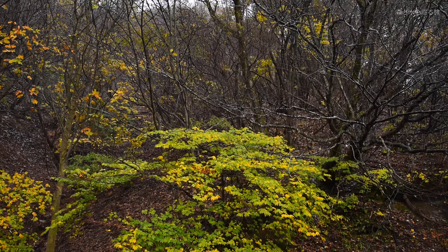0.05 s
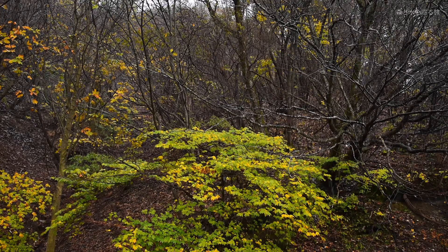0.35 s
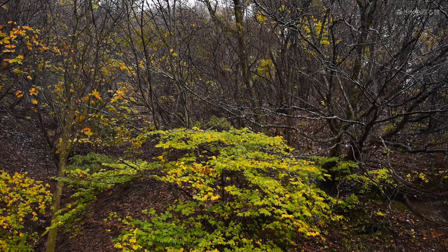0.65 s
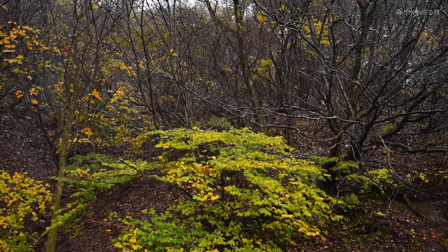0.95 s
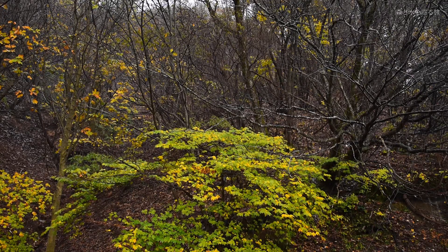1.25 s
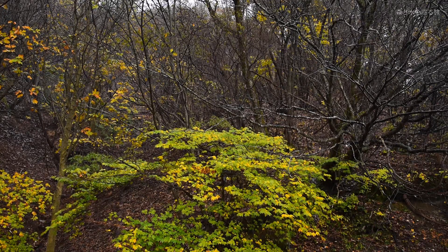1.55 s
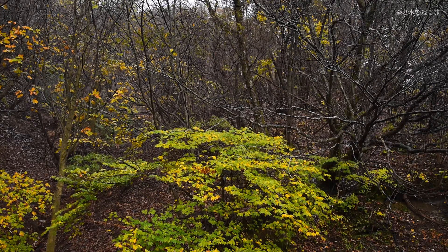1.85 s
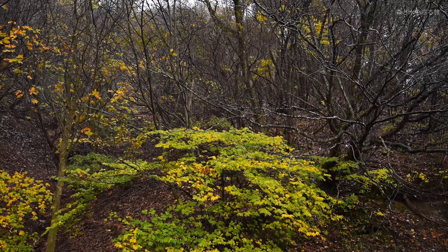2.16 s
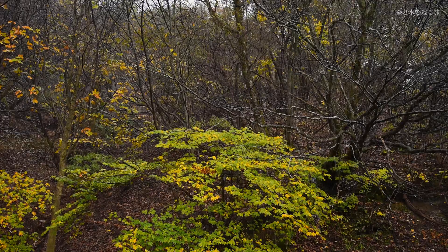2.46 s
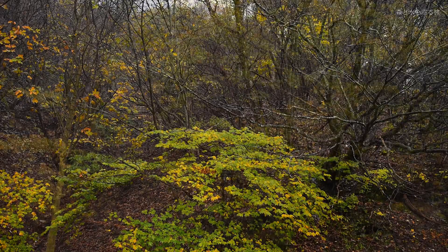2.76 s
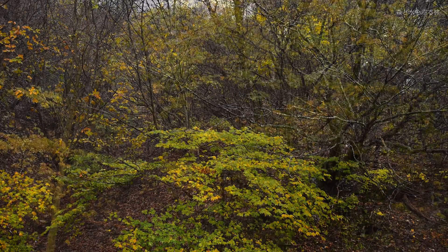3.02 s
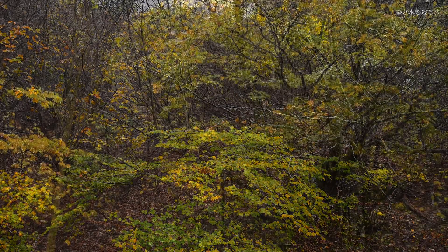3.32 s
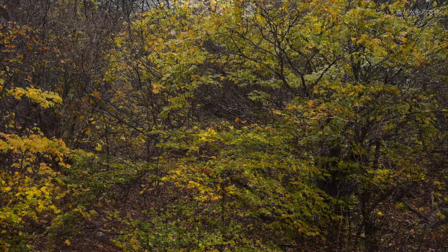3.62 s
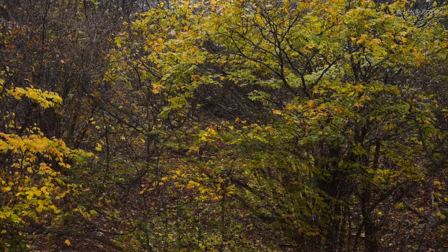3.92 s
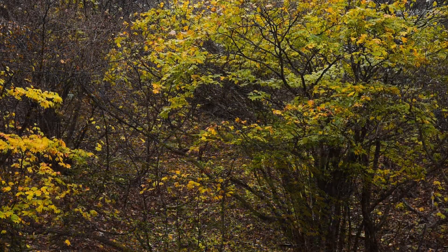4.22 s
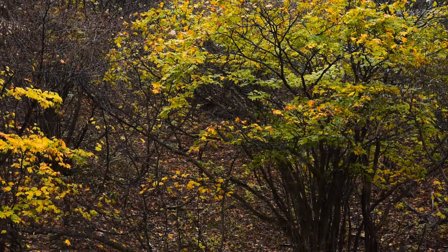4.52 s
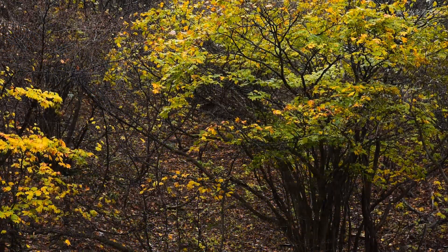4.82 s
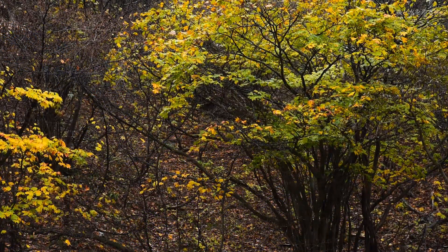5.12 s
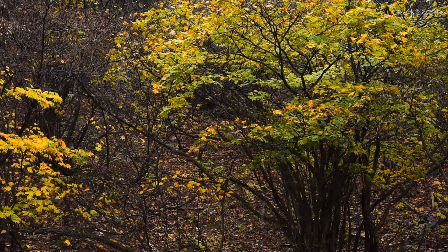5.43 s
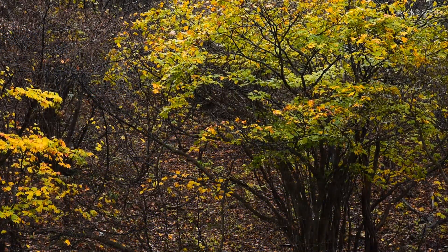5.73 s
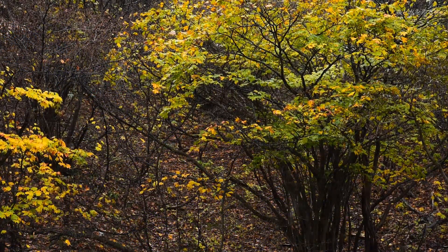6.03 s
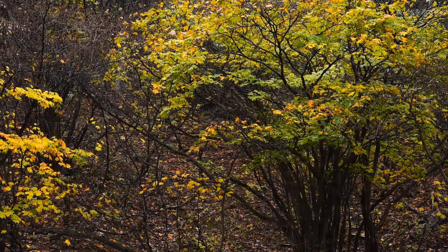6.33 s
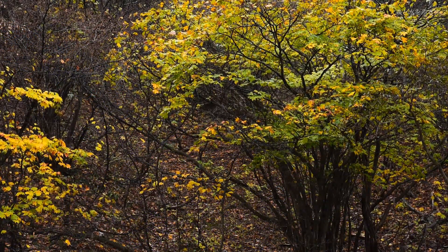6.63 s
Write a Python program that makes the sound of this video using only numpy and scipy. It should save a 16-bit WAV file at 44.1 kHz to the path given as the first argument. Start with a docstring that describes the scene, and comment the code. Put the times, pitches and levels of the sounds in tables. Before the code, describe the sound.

Steady rain falls in a wood throughout, a bright, wide hiss of fine drops on twigs with a softer patter on wet leaves. Single close drops tick and tap irregularly, the sharpest around 1.2 seconds, in a cluster just after 3, and between 4.3 and 4.8 seconds. From about 1 to 3 seconds a gusty breeze buffets the right microphone with a low flutter, strongest just before 2 seconds, then dies away. Between 2 and 3 seconds the rain thickens slightly and stays that way. Underneath, a faint distant rumble swells and sinks, along with the low, even roar of the wood. Two soft, dull thumps sound far off at about 5 and 6.3 seconds. Right after the second, a quick little spill of drips falls from a branch onto the leaf litter, and the rain carries on.

```python
"""A bright hiss of steady rain fills an autumn wood, heard by two spaced microphones. Countless drops
on twigs and wet leaves merge into a wash that slowly thickens; near drops tick and fat drips tap on leaves.
Behind it lie a distant rumble and the wood's low roar. For a few seconds a breeze buffets the right
microphone; near the end come two dull far thumps and a spill of drips from a branch."""
import sys
import numpy as np
from scipy import signal
from scipy.fft import rfft, irfft, next_fast_len
from scipy.io import wavfile

SR = 44100
rng = np.random.default_rng(int(sys.argv[2]) if len(sys.argv) > 2 else 0)


def persist_wave(psi):
    """Save psi, clipped to +-1, as 16-bit WAV."""
    counts = np.round(np.clip(psi, -1, 1) * 32767).astype(np.int16)
    wavfile.write(sys.argv[1], SR, np.atleast_2d(counts).T)


N = 298802
TIME = np.arange(N) / SR
SIZE = next_fast_len(N, True)
HZ = np.fft.rfftfreq(SIZE, 1 / SR) + 1e-3

# Tone of the rain across the whole wood. Each row: frequency in Hz, gain in dB.
RAIN_TONE = [(200, -15.5), (550, -15), (900, -13.5), (1500, -6.5), (2400, -1.5), (3300, -2.5), (4300, -2.5),
             (6500, -0.6), (8000, -0.6), (9300, 0.8), (10500, -4), (12000, -8), (14000, -11.5),
             (15700, -23.5)]


def undb(db):
    """Decibels to gain."""
    return 10 ** (np.asarray(db) / 20)


def unit(x):
    """Scale to rms 1."""
    return x / np.sqrt(np.mean(x ** 2))


def spectrum(points):
    """An EQ curve through (Hz, dB) points, as a gain at every frequency."""
    hz, db = np.transpose(points)
    return undb(np.interp(np.log(HZ), np.log(hz), db))


def colour(x, gain):
    """Filter with a gain for every frequency."""
    return irfft(rfft(x, SIZE) * gain, SIZE)[..., :N]


def band(x, hz, q):
    """One broad resonance."""
    hz = min(hz, .4 * SR)
    return signal.lfilter(*signal.iirpeak(hz, max(q, 3 * hz / SR), SR), x)


def wander(per_s):
    """A random drift with a spread of 1."""
    knots = rng.standard_normal(2048)
    return np.interp(TIME * per_s, np.arange(len(knots)), knots) * np.sqrt(3 / 2)


def swell(crest_s, length_s):
    """A smooth rise to 1 and fall, above one half for its length."""
    return .5 ** ((2 * (TIME - crest_s) / length_s) ** 2)


def place(out, start_s, sound, pan_db=0):
    """Mix a short sound in; pan is left minus right."""
    i = int(start_s * SR)
    sound = sound[:N - i]
    out[:, i:i + len(sound)] += undb([[pan_db / 2], [-pan_db / 2]]) * sound


def around(count):
    """Evenly spread angles from left to right, in radians."""
    return np.pi * ((np.arange(count) + .5) / count - .5)


def arrive(x, angle, spacing_s=.00027):
    """Sound from an angle (right is positive) reaches the nearer microphone first."""
    lag = int(round(spacing_s * SR * np.sin(angle)))
    return np.array([np.roll(x, lag), x])


def impacts(per_s, spread_db):
    """Random hits: a positive spread makes a few near and strong, a negative one makes a few faint."""
    lands = np.flatnonzero(rng.random(N) < per_s / SR)
    spread = np.minimum(rng.standard_exponential(N)[lands], 4)
    out = np.zeros(N)
    out[lands] = undb(spread_db * spread) * rng.choice([-1, 1], N)[lands]
    return out


def ring(hz, cycles):
    """A struck, well damped surface; its envelope peaks after the given cycles."""
    turns = np.arange(SR // 8) / SR * hz
    return np.sin(2 * np.pi * turns) * turns / cycles * np.exp(1 - turns / cycles)


def distant(tone, side_db):
    """Far noise, nearly the same at both microphones."""
    mid, side = unit(colour(rng.standard_normal((2, N)), spectrum(tone)))
    return mid + undb(side_db) * side * np.array([[1], [-1]])


def far_rumble(rest_db=-51):
    """A low rumble carries from far away, swelling and sinking."""
    # Tone of the rumble. Each row: frequency in Hz, gain in dB.
    tone = [(20, -32), (45, -15), (80, -5), (110, -1.5), (140, -0.5), (175, -9.5), (260, -14.5), (500, -34),
            (1200, -52)]
    # Its swells. Each row: crest time in seconds, length in seconds, rise in dB.
    swells = [(.65, 0.8, 6.5), (2.4, 2.3, 4), (6.65, 0.83, 6)]
    level_db = rest_db + sum(rise_db * swell(s, length_s) for s, length_s, rise_db in swells)
    return undb(level_db) * distant(tone, side_db=-22)


def wood_roar(rest_db=-48.5, rise_db=3.2):
    """The wood's far, even roar swells once, as the rain thickens."""
    # Tone of the roar. Each row: frequency in Hz, gain in dB.
    tone = [(60, -20), (160, 0), (240, 5), (330, 4.5), (450, -5.5), (620, -19.5), (900, -10.5), (1300, -21),
            (2500, -16)]
    level_db = rest_db + rise_db * swell(crest_s=3.2, length_s=0.88)
    return undb(level_db) * distant(tone, side_db=-9.5)


def far_thumps():
    """Something thumps dully far off."""
    # The thumps. Each row: start in seconds, level in dB, pitch in Hz.
    thumps = [(5.058, -36, 126), (6.256, -33, 120)]
    out = np.zeros((2, N))
    for start_s, db, hz in thumps:
        place(out, start_s, undb(db) * ring(hz, cycles=1.2))
    return out


def breeze(crest_s=2.6, crest_db=-42, rise_db_per_s=8, fall_db_per_s=8.5, flutter_db=2.2):
    """A gusty breeze rises and dies away; its eddies push on each microphone separately."""
    # Tone of the buffeting. Each row: frequency in Hz, gain in dB.
    tone = [(20, -30), (40, -6), (62, -5.5), (85, 3.5), (110, -3.5), (145, -11), (185, -12), (250, -21.5),
            (400, -32), (1000, -65)]
    # Gusts on top of the flow. Each row: crest time in seconds, length in seconds, strength in dB.
    gusts = [(0.43, .07, -43), (.65, .17, -45), (1.022, 0.084, -35.5), (1.276, 0.074, -42),
             (1.45, .05, -42), (1.587, .06, -28), (1.823, 0.11, -26.5), (2.03, 0.1, -33.5),
             (2.204, 0.061, -32), (2.475, 0.15, -36), (2.722, 0.082, -36.5), (2.85, .09, -37),
             (3.07, .16, -45), (3.28, .1, -42), (3.93, .22, -48)]
    since = TIME - crest_s
    flow = undb(crest_db + np.minimum(rise_db_per_s * since, -fall_db_per_s * since))
    power = flow ** 2 + sum(undb(db) ** 2 * swell(s, length_s) for s, length_s, db in gusts)
    buffeting = colour(rng.standard_normal((2, N)), spectrum(tone))
    eddies = unit(buffeting * undb(flutter_db * wander(per_s=25)))
    return eddies * np.sqrt(power) * undb([[-17], [0.5]])  # the left microphone is in the lee


def branch_spill():
    """Heavy drips shaken from a branch hit the leaf litter in a quick run."""
    # The run of drips. Each row: start in seconds, length in seconds, mid-run level in dB.
    spills = [(6.315, 0.064, -32.5)]
    # Tone of drips on the litter. Each row: frequency in Hz, gain in dB.
    tone = [(350, -25), (490, -7), (600, 6), (750, -1), (950, 3), (1200, 4), (1400, -3), (1700, 1),
            (2500, -6), (6000, -36)]
    out = np.zeros((2, N))
    for start_s, length_s, db in spills:
        drips = colour(impacts(per_s=1500, spread_db=1), spectrum(tone))[:int(length_s * SR)]
        arch = np.sin(np.linspace(0, np.pi, len(drips)))
        place(out, start_s, undb(db) * unit(drips) * arch)
    return out


def near_drops(burst_s=0.0006, spray_s=0.0055, spray_db=-12, q=1.0):
    """Each close drop is a sharp splash, a little spray and the brief ring of the leaf it hits."""
    # The drops, before the roll-off. Each row: start in seconds, splash peak in dB, splash centre in Hz,
    # leaf level in dB, leaf pitch in Hz, cycles to the ring's peak, left minus right in dB.
    drops = [(.318, -21, 4600, -23, 4500, 4, 1), (.803, -16, 6500, -26, 6200, 4, 0),
             (1.187, -9, 8800, -38, 3000, 1, -3), (1.445, -13, 9000, -31, 2200, .5, 0),
             (1.889, -19, 8000, -46, 2000, 1, -1), (1.967, -24, 8000, -32, 1700, .7, -1),
             (2.170, -14, 6000, -31, 3300, .9, -5), (3.057, -9.5, 7200, -26, 4200, 2, 2),
             (3.061, -15, 6200, -26, 4700, 2.5, -4), (3.1354, -7, 7500, -19.5, 1776, 2.5, 1),
             (3.2095, -12, 7100, -42, 2500, 1, -4), (3.541, -21, 7000, -29, 2000, .7, -1),
             (3.963, -17, 6200, -27.5, 1600, 1, 5), (4.332, -11, 4600, -21, 4730, 2.5, -1),
             (4.502, -12, 9000, -37, 2500, 1, 1), (4.8358, -9.5, 7550, -36, 2000, .7, 2),
             (4.947, -32, 5000, -34.5, 560, 1.1, 3), (5.148, -26, 6000, -28, 1200, .6, -2),
             (5.8195, -12, 8000, -44, 2500, 1, 11), (6.453, -28, 6000, -30, 1300, 0.83, 2)]
    # Modes of a wet leaf. Each row: multiple of its pitch, gain in dB.
    leaf_modes = [(.88, -5), (1, 2.5), (1.1, -12)]
    # The top of every splash is rolled off, so it sounds duller. Each row: frequency in Hz, gain in dB.
    roll_off = [(2000, -3.5), (9000, -5), (12000, -6.5), (15500, -13)]
    out, age = np.zeros((2, N)), np.arange(SR // 8) / SR
    fade = np.exp(-age / burst_s) + undb(spray_db) * np.exp(-age / spray_s)
    for start_s, splash_db, splash_hz, leaf_db, leaf_hz, cycles, pan_db in drops:
        burst = rng.standard_normal(len(age)) * fade
        splash = band(band(burst, splash_hz, q), splash_hz, q)
        splash /= np.abs(splash).max()
        leaf = sum(undb(db) * ring(leaf_hz * multiple, cycles) for multiple, db in leaf_modes)
        place(out, start_s, undb(splash_db) * splash + undb(leaf_db) * leaf, pan_db)
    return colour(out, spectrum(roll_off))


def patter(low_hz, high_hz, per_s, spread_db, cycles, count):
    """Random taps ring briefly, as drops do on leaves of many sizes; each pitch has its own direction."""
    out = 0
    for hz, angle in zip(np.geomspace(low_hz, high_hz, count), rng.permutation(around(count))):
        taps = signal.oaconvolve(impacts(per_s, spread_db), ring(hz, cycles))[:N]
        out = out + arrive(unit(taps), angle)
    return unit(out)


def bush_splashes(low_hz=3800, high_hz=10500, burst_s=0.00033, spray_s=0.014, spray_db=-11):
    """Drops burst on the bushes to either side, in six registers; their spray lands just after."""
    out, age = 0, np.arange(SR // 16) / SR
    power = np.exp(-2 * age / burst_s) + undb(spray_db) ** 2 * np.exp(-2 * age / spray_s)
    for hz in np.geomspace(low_hz, high_hz, 6):
        sides = [impacts(per_s=22, spread_db=2.0) for _ in range(2)]
        envelopes = [np.sqrt(np.abs(signal.oaconvolve(hits ** 2, power)[:N])) for hits in sides]
        out = out + band(envelopes * rng.standard_normal((2, N)), hz, q=2.9)
    return unit(colour(out, spectrum(RAIN_TONE)))


def rain_hiss(trees=16, flutter_db=1.34, bush_angle=-0.47, bush_db=4.0):
    """Fine drops click on twigs all round, each tree in its own rhythm; a bush on the left is nearest."""
    out = 0
    for angle in around(trees):
        near_db = bush_db * np.exp(-((angle - bush_angle) / 0.4) ** 2)
        clicks = unit(impacts(per_s=2200, spread_db=2.5))
        tree = clicks * undb(flutter_db * wander(per_s=22) + near_db)
        out = out + arrive(tree, angle)
    return unit(colour(out, spectrum(RAIN_TONE)))


def scene(light_db=-32, full_db=-30, thickens_s=2.53, ease_s=0.42):
    """Rain near and far over the low sounds of the wood; one fader lifts hiss and patter alike."""
    thickness = (1 + np.tanh((TIME - thickens_s) / (2 * ease_s))) / 2
    fader_db = light_db + (full_db - light_db) * thickness
    # Faint, brief high pings in the hiss.
    treble_pings = patter(low_hz=5450, high_hz=10000, per_s=42, spread_db=-1.5, cycles=3.0, count=12)
    sizzle = undb(3.0) * rain_hiss() + undb(-4.5) * bush_splashes() + undb(-12) * treble_pings
    leaves = patter(low_hz=882, high_hz=3520, per_s=100, spread_db=1.5, cycles=0.85, count=10)
    litter = patter(low_hz=416, high_hz=925, per_s=45, spread_db=2.2, cycles=0.89, count=7)
    rain = undb(fader_db) * (sizzle + undb(-14) * leaves + undb(-21.5) * litter)
    return rain + far_rumble() + wood_roar() + near_drops() + branch_spill() + far_thumps() + breeze()


def record(dry, top_hz=15700):
    """The two microphones differ in the treble; the top is cut steeply."""
    # The left microphone is the brighter one. Each row: frequency in Hz, left minus right in dB.
    balance = [(300, 0), (800, 1), (6000, 0), (7200, 1.2), (8800, 5), (11000, 2.5), (15000, 3)]
    lean = np.sqrt(spectrum(balance))
    high_cut = 1 / np.sqrt(1 + (HZ / top_hz) ** 300)
    return colour(dry, high_cut * np.array([lean, 1 / lean]))


dry = scene()
out = record(dry)
persist_wave(out)
```